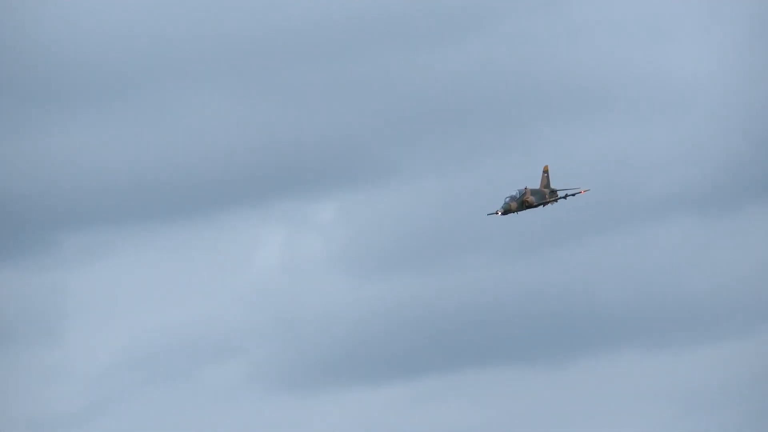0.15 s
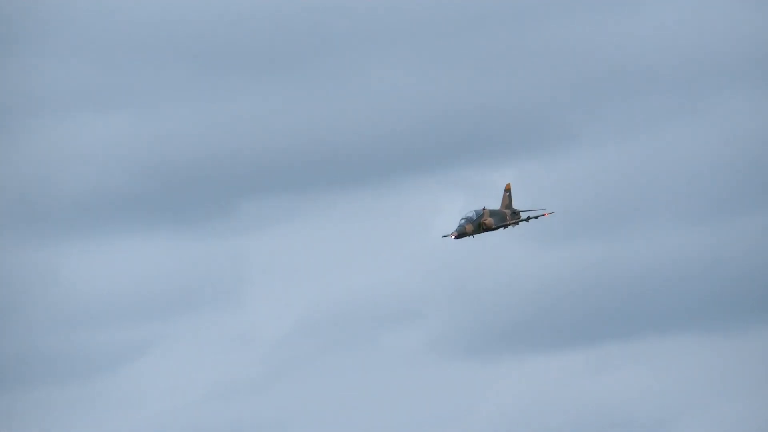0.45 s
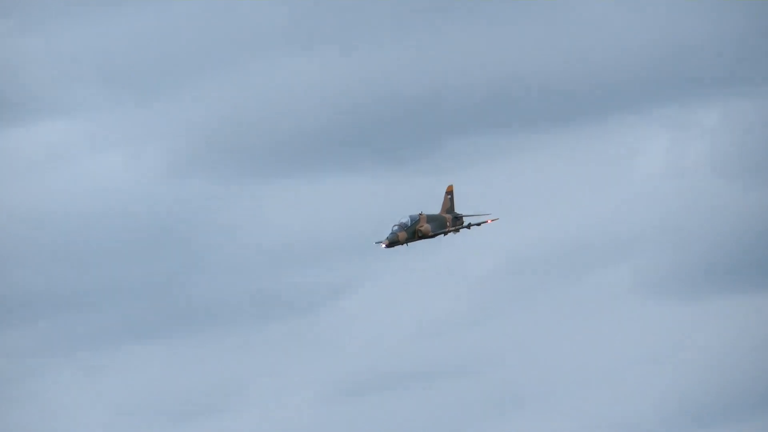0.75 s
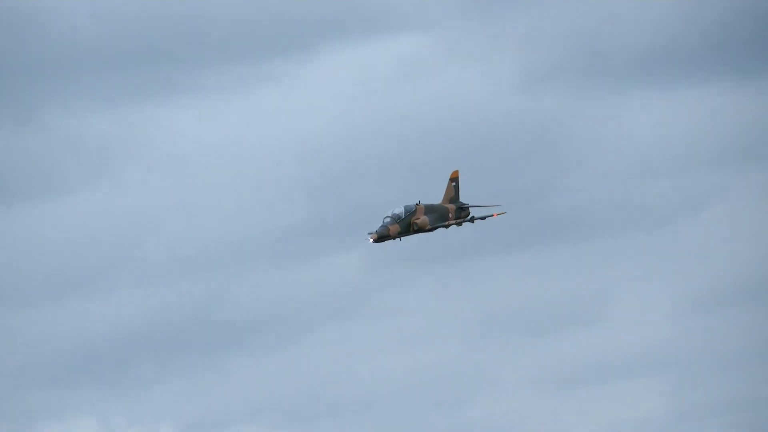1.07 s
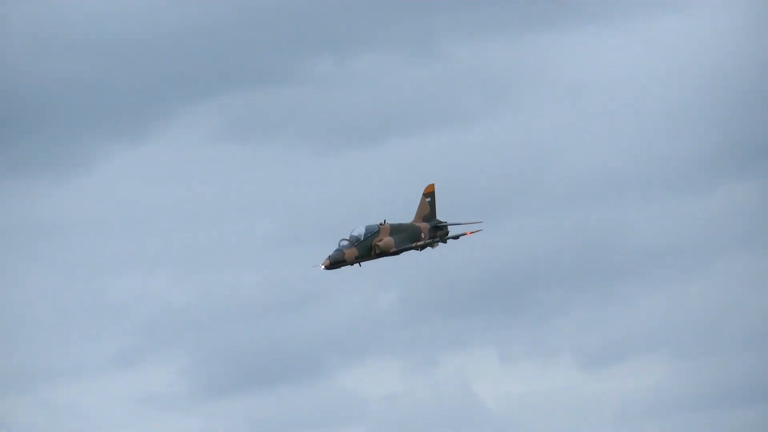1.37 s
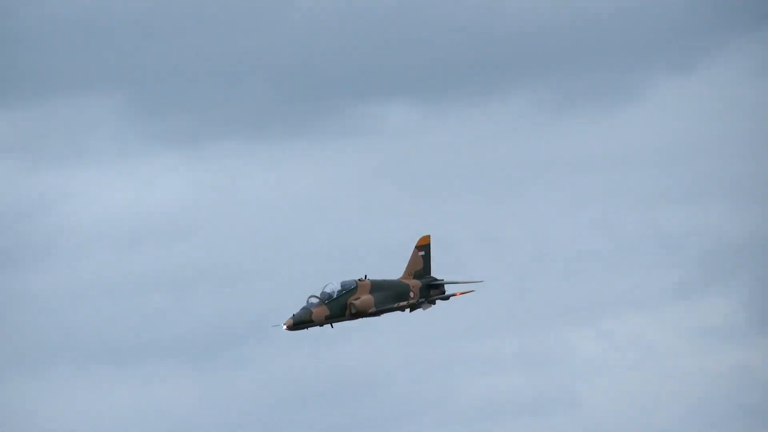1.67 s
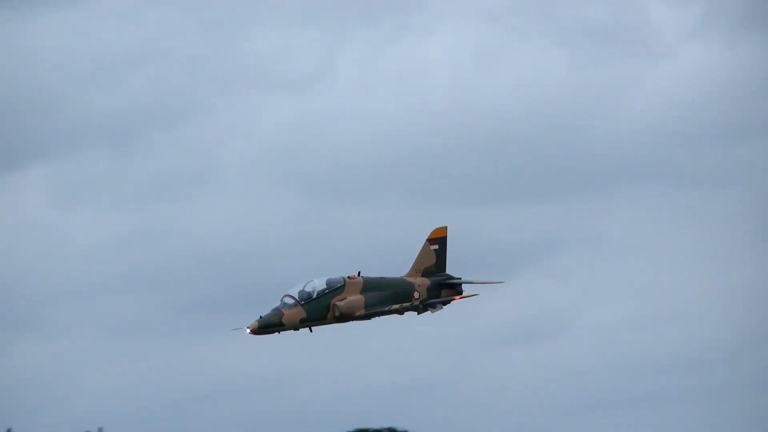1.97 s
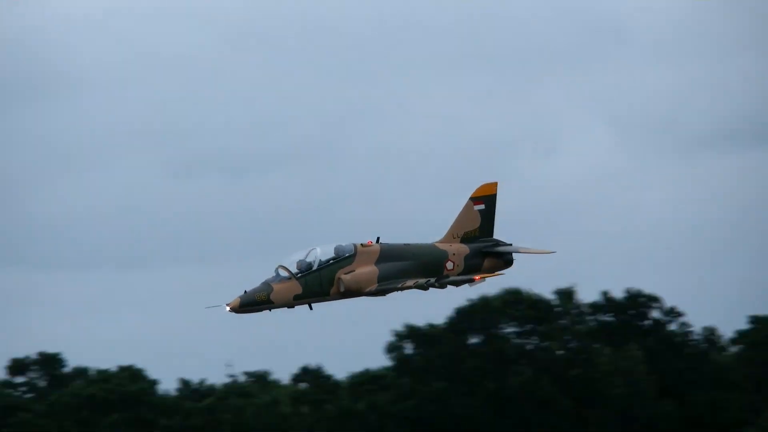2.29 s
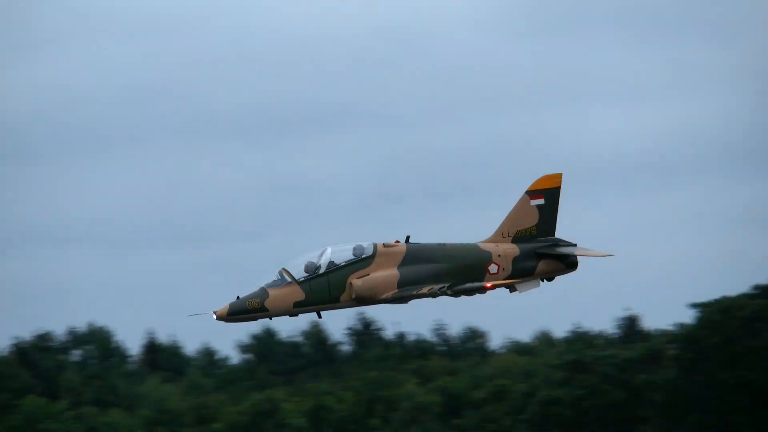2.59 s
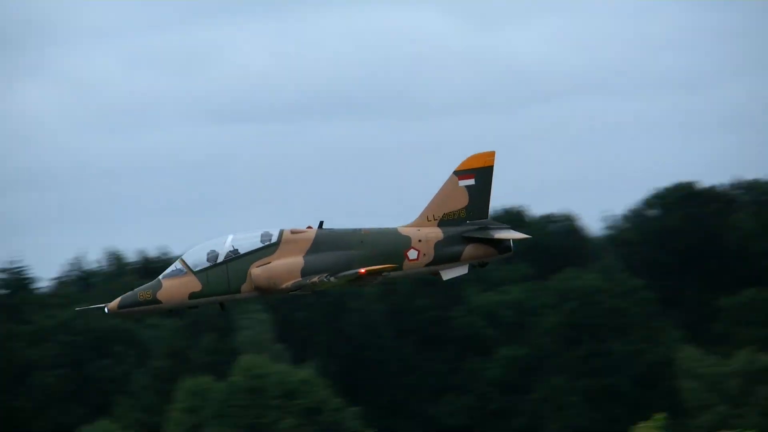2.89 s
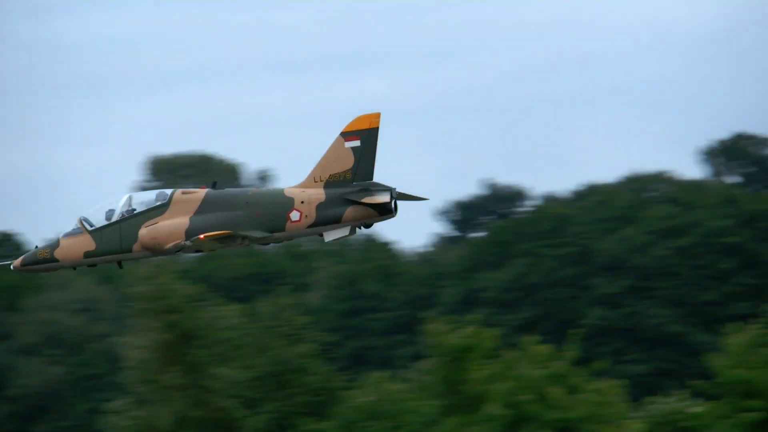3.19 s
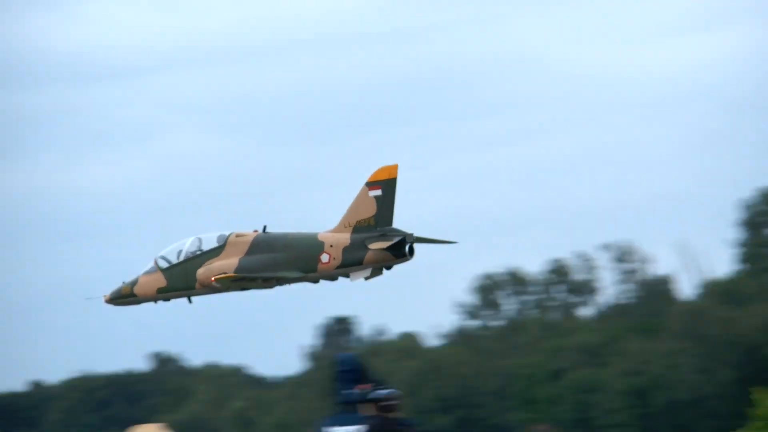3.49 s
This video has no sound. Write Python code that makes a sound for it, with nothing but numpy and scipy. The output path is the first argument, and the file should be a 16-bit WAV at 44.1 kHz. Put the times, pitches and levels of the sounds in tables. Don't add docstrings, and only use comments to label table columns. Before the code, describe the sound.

Distant jet roar with a wavering high shaft whine grows steadily into a close, broad, gritty rush as the whine sags in pitch; soft wind and early faint clicks on the camera microphone, outdoors, no echo.

```python
import sys
import numpy as np
from scipy import signal
from scipy.fft import rfft, irfft, next_fast_len
from scipy.io import wavfile
from scipy.ndimage import uniform_filter1d, map_coordinates

SR = 44100
rng = np.random.default_rng(int(sys.argv[2]) if len(sys.argv) > 2 else 0)


def to_wav(s):
    ch = np.atleast_2d(s).T
    pcm = np.round(np.clip(ch, -1, 1) * 32767)
    wavfile.write(sys.argv[1], SR, pcm.astype(np.int16))


def amplitude_ratio(level_db):
    exponent = np.asarray(level_db, float) / 20
    return 10 ** exponent


N = 160965

# (time [s], level [dB])
APPROACH = [(0, -32.5), (.3, -34.5), (.42, -32.5), (.52, -25.5), (.76, -30), (.95, -27.5), (1.2, -26),
            (1.36, -26.5), (1.5, -23.5), (1.85, -25.5), (2.02, -23), (2.25, -25.5), (2.45, -25.5),
            (2.8, -21.5), (3.06, -21.5), (3.25, -20), (3.45, -16.5), (3.65, -18.5)]
# (frequency [Hz], density [dB per Hz])
ROAR_COLOUR = [(350, -20), (600, -2), (1120, -4), (2270, -6), (2670, -6.5), (3670, -9.5), (7850, -20.5),
               (13400, -42), (14500, -56)]
# (time [s], share [signed, minus = inverted])
AIRFRAME_ECHO = [(0, 0), (3.22, 0.041), (3.28, 0.26), (3.4, 0.58), (3.44, -0.49), (3.525, -0.55),
                 (3.56, 0.63), (3.65, -0.13)]


def jet():
    roar_db, echo_delay_s = 3, 0.000746

    def patchy_db(hz):
        return along([(1000, 0.8), (3000, 2)], hz)

    def reflection(hz):
        delay = np.exp(-2j * np.pi * hz * echo_delay_s)
        return delay / (1 + (1300 / (hz + 1)) ** 4)

    roar = rush(lambda hz: along(ROAR_COLOUR, hz), lambda hz: 0 * hz, patchy_db)
    echo = filtered(roar, reflection)
    exhaust = shaped(roar + curves(AIRFRAME_ECHO)[0] * echo, air_db)
    level_db, = curves(APPROACH)
    return amplitude_ratio(level_db) * (amplitude_ratio(roar_db) * exhaust + turbine())


# (time [s], shaft pitch [Hz], shaft tone level [dB], blade tone level [dB])
SPOOL = [(0, 1830, -20, -50), (.2, 1828, -11, -50), (.6, 1828, -14.5, -46), (.8, 1834, -18, -44),
         (1.1, 1840, -26, -42), (1.3, 1880, -22, -48), (1.5, 1975, -17, -46), (1.75, 2006, -12, -41),
         (2.05, 1975, -18, -31), (2.3, 1950, -28, -14), (2.45, 1935, -34, -34), (2.75, 1850, -36, -33),
         (3.1, 1900, -34, -42), (3.65, 1690, -38, -48)]


def turbine():
    blades, blur_hz = 7, 8.2
    blade_fade_db, rasp = 3, 0.86
    shaft_fade_db, shaft_wander_rad = 2, 0.8
    hz, shaft_db, blade_db = curves(SPOOL)
    turns = 2 * np.pi * np.cumsum(hz) / SR

    blur = 2 * np.pi * blades * np.cumsum(blur_hz * wobble(150)) / SR
    blade_level = amplitude_ratio(blade_db + blade_fade_db * wobble(14)) * (1 + rasp * wobble(300))
    blade = blade_level * np.sin(blades * turns + blur)

    shaft_level = amplitude_ratio(shaft_db + shaft_fade_db * wobble(7.8))
    shaft = shaft_level * np.sin(turns + shaft_wander_rad * wobble(24.2))
    return shaft + blade


# (time [s], treble gain at the reference pitch [dB], low edge of the roar [Hz], deep roar gain [dB])
CLEARING = [(0, -14.5, 550, -4), (.5, -11.5, 573, -7), (1.3, -9.5, 535, -1), (1.8, -4, 500, 2),
            (2.1, -2.5, 484, 3), (2.35, 4, 520, 2.5), (2.85, 3.5, 526, 6), (3.2, 6.5, 560, 3),
            (3.65, 3, 594, -6.5)]
# (time [s], width [s], gain at the reference pitch [dB])
EDDIES = [(.1, 0.022, -5), (.55, 0.037, -0.5), (.66, 0.03, -9), (.74, 0.03, 4), (.92, 0.031, 6),
          (1.06, 0.035, -6.5), (1.18, 0.042, 2), (1.28, 0.058, -1.5), (1.42, 0.026, 5.5), (1.51, 0.018, 2),
          (1.669, .03, -4), (2.02, 0.012, 2.5), (2.2, .03, 3), (2.36, 0.064, 5), (2.455, 0.023, -6),
          (2.7, 0.016, 1.5), (2.823, 0.015, -7), (2.918, 0.014, -7.5), (3.02, 0.032, 3.5),
          (3.076, 0.01, -8.5), (3.17, 0.0035, 5), (3.24, 0.0047, -11.5), (3.278, 0.018, 3),
          (3.39, 0.0085, 0), (3.44, 0.0097, -3.5), (3.53, 0.019, -1.5), (3.599, 0.017, 4)]
# (time [s], level [dB])
HOWL = [(0, 1), (1.3, -3.5), (1.5, 0.5), (2.1, 0.5), (2.7, -0.5), (2.8, 9.5), (3.1, 4.5), (3.2, 5.5),
        (3.3, -4), (3.42, -11.5), (3.5, -3), (3.65, -8)]


def air_db(hz, t):
    reference_hz, treble_power, flutter_db = 6130, 0.87, 0.98
    low_cut_steepness, low_leak_db = 17, -11.5
    deep_hz, deep_octaves, howl_width_hz = 794, 0.6, 180
    treble_db, edge_hz, deep_db = curves(CLEARING, t)

    swing = treble_db + sum(db * np.exp(-((t - s) / w) ** 2) for s, w, db in EDDIES)
    swing = swing + flutter_db * wobble(30.09)[np.minimum(t * SR, N - 1).astype(int)]
    treble = swing * (hz / reference_hz) ** treble_power

    leak = amplitude_ratio(2 * low_leak_db) * np.minimum(hz / edge_hz, 1) ** 3
    low_cut = 1 / (1 + (edge_hz / (hz + 1)) ** low_cut_steepness) + leak
    deep = deep_db * np.exp(-(np.log2((hz + 1) / deep_hz) / deep_octaves) ** 2)
    shaft_hz = curves(SPOOL, t)[0]
    howl = curves(HOWL, t)[0] * np.exp(-((hz - shaft_hz) / howl_width_hz) ** 2)
    return treble + 10 * np.log10(low_cut + 1e-12) + deep + howl


# (frequency [Hz], width [Hz], gain [dB])
NOTCHES = [(1693, 230, -6.5), (2233, 644, -13), (3095, 380, -12.5), (3694, 307, -27), (4490, 190, -11),
           (5165, 410, -5), (6700, 1260, -4), (7800, 1200, 2), (9000, 130, -9)]


def notches(hz):
    response = 1
    for centre, width, db in NOTCHES:
        off_centre = centre * centre - hz ** 2
        loss = 1j * hz * width
        response = response * (off_centre + loss * amplitude_ratio(db)) / (off_centre + loss)
    return response


# (frequency [Hz], width [Hz], side over mid [dB], phase [rad])
PORT_GAP = [(960, 1300, -20, 1.5), (2930, 530, -13.5, -1.95), (4650, 690, -10.5, -2.5),
            (8330, 2000, -7, -2), (11200, 570, -9, -0.8), (13200, 1200, -13, 3)]


def ports(direct, scattered):
    scatter = 0.84

    def gap(hz):
        return sum(amplitude_ratio(db) * np.exp(1j * turn - ((hz - c) / w) ** 2) for c, w, db, turn in PORT_GAP)

    side = filtered(direct, gap) + scatter * filtered(scattered, gap)
    return np.array([direct + side, direct - side])


# (time [s], peak level [dB])
TICKS = [
    (.222, -34),
    (.392, -39),
    (.535, -47),
]


def ticks():
    out, t = np.zeros((2, N)), np.arange(300) / SR
    for s, db in TICKS:
        click = amplitude_ratio(db - 60 * t / 0.0045) * rng.standard_normal((2, len(t)))
        out[:, round(s * SR):][:, :len(t)] += click
    return filtered(out, lambda hz: 1 / (1 + (5500 / (hz + 1)) ** 4) / (1 + (hz / 11000) ** 8))


# (frequency [Hz], density [dB per Hz])
GUST_COLOUR = [(15, -55), (25, -39), (141, -5), (397, -1.5), (1770, -8.5), (2420, -14.5), (3850, -10),
               (8580, -40), (12000, -57), (15600, -76), (22000, -120)]
# (time [s], level [dB])
WIND = [(0, -60), (.3, -59), (.62, -56.5), (.9, -52), (1.15, -54), (1.5, -55.5), (1.9, -57), (2.05, -58),
        (2.24, -55.5), (2.35, -57), (2.5, -55.5), (2.75, -55), (2.93, -53), (3.1, -61), (3.25, -77),
        (3.32, -63), (3.41, -88), (3.52, -55), (3.65, -61)]
# (frequency [Hz], left-right likeness [-1 to 1])
WIND_PORTS = [(30, 0), (80, -0.58), (160, 0.22), (300, 0.21)]
# (time [s], share removed [1 = all, negative = boosted])
THUMP_CUT = [(0, -0.6), (1.2, -0.63), (1.9, .2), (2.3, .7), (2.85, 0.7), (2.95, -0.1), (3.1, 0.28),
             (3.25, 0.92), (3.65, 1)]


def wind():
    wind_db, lumps_db, thump_hz = 13, 1, 120
    air = rush(lambda hz: along(GUST_COLOUR, hz), lambda hz: along(WIND_PORTS, hz), lambda hz: 2.5)
    thumps = filtered(air, lambda hz: 1 / (1 + (hz / thump_hz) ** 6))
    air = air - curves(THUMP_CUT)[0] * thumps
    lumps = lumps_db * np.array([wobble(6.92), wobble(6.9)])
    return amplitude_ratio(curves(WIND)[0] + wind_db + lumps) * air


def rush(colour_db, alike, patchy_db):
    def patches(hz, t):
        field = rng.standard_normal((len(hz), len(t)))
        field = uniform_filter1d(field, size=8, axis=0)
        field = uniform_filter1d(field, size=10, axis=1)
        return patchy_db(hz) * unit(field)

    def mid_side(hz):
        turn = np.arccos(np.clip(alike(hz), -1, 1)) / 2
        return amplitude_ratio(colour_db(hz)) * np.array([np.cos(turn), np.sin(turn)])

    pair = shaped(rng.standard_normal((2, N)), patches)
    mid, side = filtered(pair, mid_side)
    return unit(np.array([mid + side, mid - side]))


def unit(x):
    return x / np.sqrt(np.mean(x ** 2) + 1e-20)


def along(points, hz):
    f, v = np.transpose(points)
    return np.interp(np.log(hz + 1), np.log(f + 1), v)


def curves(rows, t=None):
    s, *cols = np.transpose(rows)
    when = np.arange(N) / SR if t is None else t
    return [np.interp(when, s, c) for c in cols]


def wobble(rate):
    return map_coordinates(rng.standard_normal(2000), [np.arange(N) * min(rate, 500) / SR])


def filtered(x, response):
    m = next_fast_len(N + 8192)
    return irfft(rfft(x, m) * response(np.fft.rfftfreq(m, 1 / SR)), m)[..., :N]


def shaped(x, gain_db):
    hz, t, z = signal.stft(x, SR, nperseg=512)
    return signal.istft(z * amplitude_ratio(gain_db(hz[:, None], t)), SR, nperseg=512)[1][..., :N]


def scene():
    return ports(*filtered(jet(), notches)) + ticks() + wind()


def low_pass(x):
    return signal.sosfilt(signal.butter(12, 14720, fs=SR, output="sos"), x)


def record(dry):
    return low_pass(dry)


dry = scene()
out = record(dry)
to_wav(out)
```